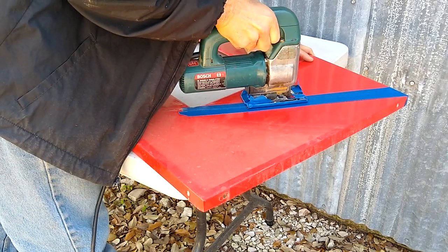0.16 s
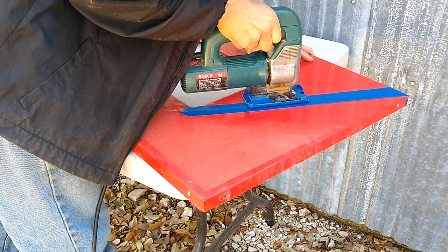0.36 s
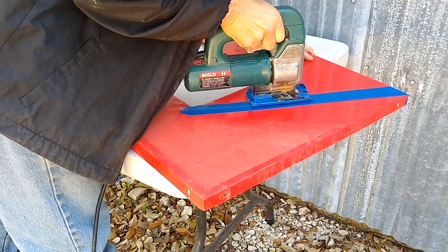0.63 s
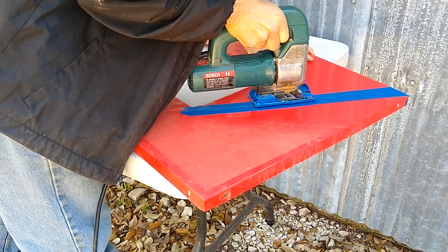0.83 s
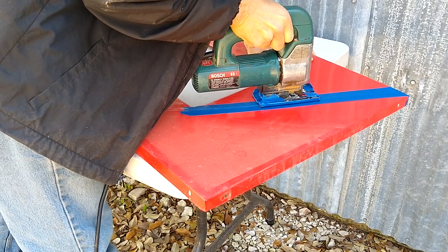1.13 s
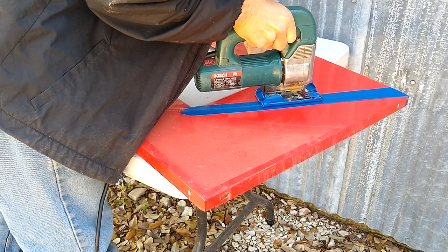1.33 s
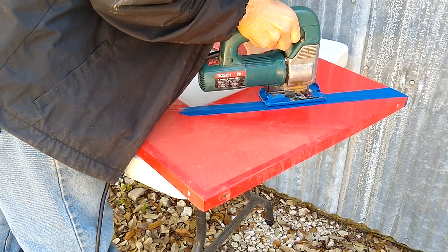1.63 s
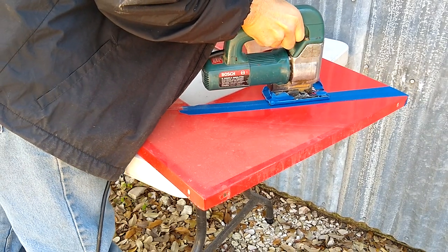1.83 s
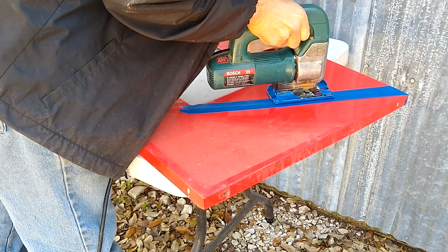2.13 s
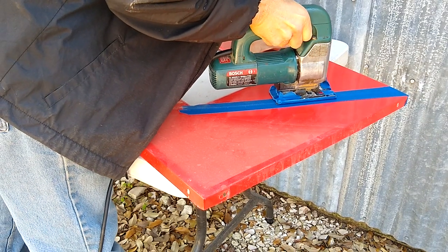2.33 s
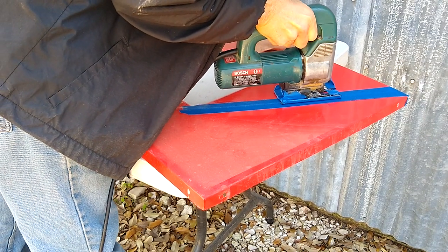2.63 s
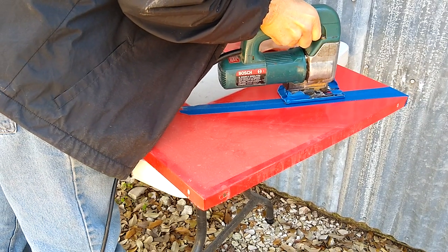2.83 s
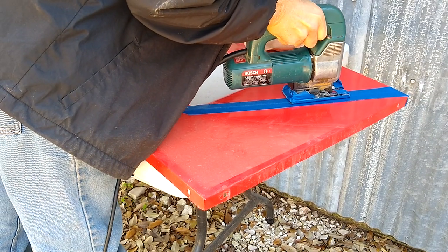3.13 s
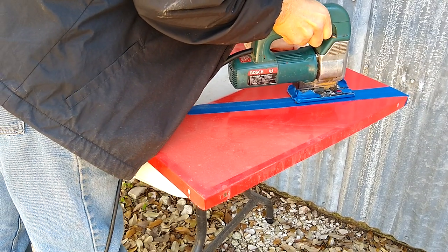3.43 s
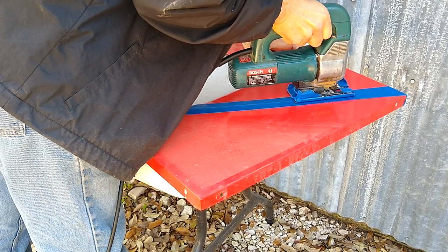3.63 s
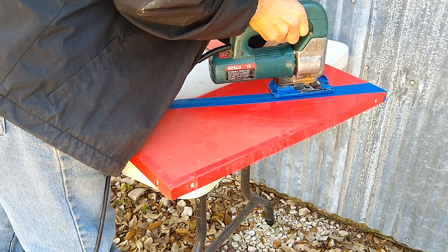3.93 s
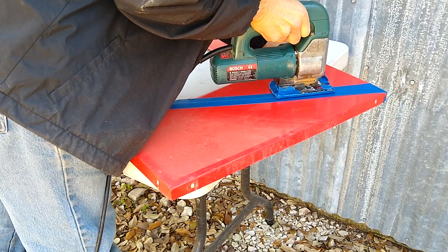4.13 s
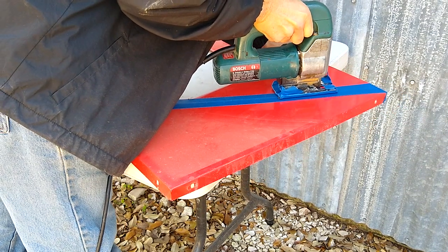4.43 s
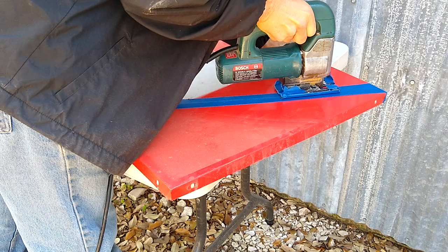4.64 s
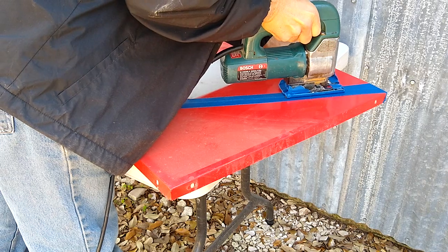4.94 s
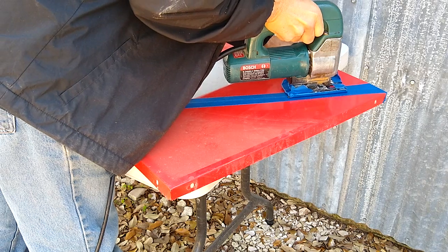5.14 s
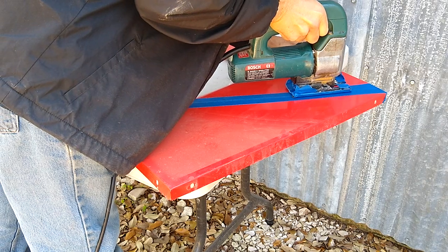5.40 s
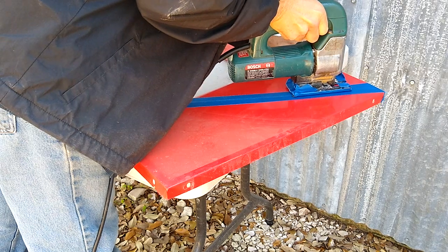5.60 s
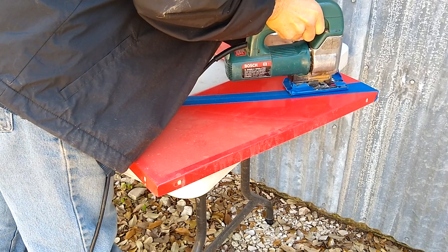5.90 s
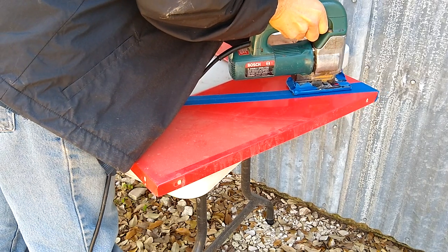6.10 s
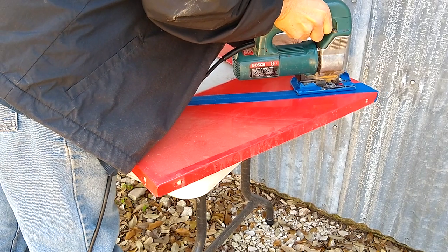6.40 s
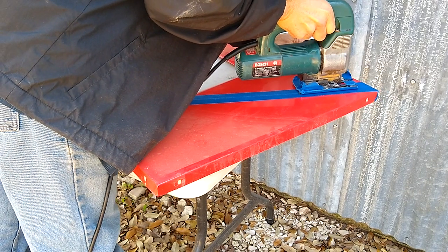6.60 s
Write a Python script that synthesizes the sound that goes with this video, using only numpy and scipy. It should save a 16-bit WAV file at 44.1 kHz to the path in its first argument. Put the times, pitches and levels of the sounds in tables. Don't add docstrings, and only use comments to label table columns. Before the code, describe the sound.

A jigsaw buzzes and squeals through sheet steel outdoors, sagging and recovering about seven times a second, pausing briefly midway, with loose metal slaps.

```python
import sys
import numpy as np
from scipy import signal
from scipy.fft import rfft, irfft, next_fast_len
from scipy.io import wavfile
from scipy.ndimage import uniform_filter1d, map_coordinates

SR = 44100
rng = np.random.default_rng(int(sys.argv[2]) if len(sys.argv) > 2 else 0)


def boost(x):
    u = np.asarray(x, float) / 20
    return 10 ** u


def put_to_file(sound):
    columns = np.atleast_2d(sound).T
    safe = np.clip(columns, -1, 1)
    whole_steps = np.round(safe * 32767)
    wavfile.write(sys.argv[1], SR, whole_steps.astype(np.int16))


N = 298116


def evened(x):
    return x / np.sqrt(np.mean(x ** 2) + 1e-20)


def read(points, hz, axis=1):
    table = np.transpose(points)
    return np.interp(np.log(hz + 1), np.log(table[0] + 1), table[axis])


def coloured(x, spectrum):
    gain = boost(read(spectrum, np.fft.rfftfreq(N, 1 / SR)))
    return evened(irfft(rfft(x) * gain, N))


def resonate(x, hz, width_hz):
    carrier = np.exp(2j * np.pi * np.cumsum(hz * np.ones(len(x))) / SR)
    pole = np.exp(-np.pi * width_hz / SR)
    return 2 * (carrier * signal.lfilter([1 - pole], [1, -pole], x / carrier)).real


def add(mix, start_s, sound):
    part = mix[round(start_s * SR):][:len(sound)]
    part += sound[:len(part)]


def grit(per_s, spread_db):
    chips = rng.random(N) < per_s / SR
    size_db = spread_db * np.minimum(rng.exponential(1, N), 4)
    return chips * rng.standard_normal(N) * boost(size_db)


def patches(shape, bins, frames):
    field = uniform_filter1d(rng.standard_normal(shape), size=bins, axis=0)
    return evened(uniform_filter1d(field, size=frames, axis=1))


def recoveries(cut):
    start_s, speed_hz, bite_db = np.vstack([cut, np.array(cut[-1]) + [.145, 0, 0]]).T
    top_s = start_s[:-1] + .47 * np.diff(start_s)
    top_hz = (speed_hz[:-1] + speed_hz[1:]) / 2 + 29.005
    top_bite_db = -42 + 0.73 * ((bite_db[:-1] + bite_db[1:]) / 2 + 44.0)
    return np.transpose([top_s, top_hz, top_bite_db])


def motor_states():
    # start_s [s], speed_hz [Hz], bite_db [dB]
    first_cut = [(.006, 164.4, -43.5), (.143, 141.3, -47), (.33, 167.2, -49), (.502, 164.2, -43),
                 (.65, 166.7, -41.5), (.799, 155.6, -40.5), (.931, 151, -40.5), (1.088, 139.7, -43),
                 (1.215, 143, -40), (1.352, 152.4, -41), (1.518, 156.5, -40.5), (1.669, 148.8, -42),
                 (1.814, 140.7, -42), (1.964, 138, -43.5), (2.11, 144.2, -41.5), (2.256, 144.4, -44),
                 (2.403, 161.4, -42.5), (2.559, 147.5, -42), (2.701, 148.5, -42.5), (2.848, 150.5, -41),
                 (2.979, 152.9, -41), (3.13, 156.2, -40), (3.277, 155.7, -40.5), (3.404, 162.3, -38.5),
                 (3.577, 155, -40.5)]
    second_cut = [(4.194, 141.7, -42.5), (4.347, 156.4, -43), (4.483, 153, -41), (4.611, 156.4, -41.5),
                  (4.772, 149.8, -43.5), (4.923, 143.3, -44.5), (5.071, 148.4, -43.5), (5.214, 156.2, -42),
                  (5.358, 149.1, -43.5), (5.496, 152.4, -43.5)]
    last_cut = [
        (5.912, 155, -38.5),
        (6.061, 163.8, -42.5),
        (6.214, 168.8, -39),
        (6.365, 152, -40.5),
        (6.559, 135.4, -46),
        (6.71, 138.8, -42.5),
    ]
    # start_s [s], speed_hz
    # [Hz], bite_db [dB]
    hand_eases = [
        (3.702, 177, -57),
        (3.821, 132.2, -57),
        (3.863, 136.8, -59),
        (3.948, 119.3, -57),
        (4.041, 130.7, -56),
        (4.088, 156.3, -48),
        (4.12, 171.6, -46),
                  (5.64, 151.7, -42.5),
        (5.689, 130.6, -58),
        (5.769, 150.8, -52),
        (5.799, 156.1, -40.5),
        (5.862, 170.4, -39),
    ]
    cuts = first_cut, second_cut, last_cut
    bottoms = np.vstack(cuts)
    tops = np.vstack([recoveries(cut) for cut in cuts])
    eases = np.array(hand_eases)
    rows = np.vstack([np.c_[part, np.full(len(part), swing)]
                      for part, swing in [(bottoms, -1), (tops, 1), (eases, 0)]])
    return rows[np.argsort(rows[:, 0])].T


def control(name):
    stage_ends = [1.4, 2.3, 3.15, 3.9, 4.95, 5.72]
    # hiss_db [dB], fizz_db [dB], rumble_db [dB]
    stage_lifts = [(0, 0, -0.3), (-0.5, -0.5, 0.3), (0.3, -1.5, -0.5), (0.1, 0, -.7), (0.6, 2.5, -2.5),
                   (0.6, 1, -0.6), (1, 1, 0.7)]
    start_s, speed_hz, bite_db, swing = motor_states()
    missing_db = np.minimum(bite_db + 45, 0)
    stage = sum(np.clip((start_s - end_s) / 0.28 + .5, 0, 1) for end_s in stage_ends)
    hiss_db, fizz_db, rumble_db = (np.interp(stage, np.arange(len(stage_lifts)), lift)
                                   for lift in np.transpose(stage_lifts))
    values = dict(
        speed_hz=speed_hz,
        bite_db=bite_db,
        hiss_db=hiss_db - 50 + 0.44 * swing + 0.18 * missing_db,
        fizz_db=fizz_db - 50 + 1.2 * swing + 0.29 * missing_db,
        rumble_db=rumble_db - 57 + 0.67 * swing + 0.38 * missing_db)
    return uniform_filter1d(np.interp(np.arange(N) / SR, start_s, values[name]), size=600)


def throb(turns, depth, third):
    return np.exp(depth * np.cos(2 * np.pi * turns) + third * np.cos(3 * 2 * np.pi * turns + 1))


def wear(turns):
    surface = rng.standard_normal((round(N / SR) * 256, 257))
    surface = uniform_filter1d(surface, size=5, axis=0)
    return evened(map_coordinates(surface, [turns, turns % 1 * 256], order=1))


def panel(x):
    # mode_hz [Hz], lift_db [dB]
    young_cut = [
        [(1050, 1), (1170, 6), (1490, 4), (3160, 5), (3350, 1), (6890, 10.5), (7460, 9), (9460, 3.5),
         (11020, -14), (11590, 1), (12540, -1), (13120, 4), (13650, 9), (14840, 5)],
        [(730, 13.5), (1170, 7), (1890, 3), (3370, 5.5), (5310, 8), (5480, 6), (6850, 8), (7580, 13.5),
         (7760, 6), (9820, 8.1), (10120, 0), (10270, -3), (10980, -1), (11590, 6)],
        [(680, 0), (1030, -2), (2880, 0.5), (3350, 2), (4340, 1.5), (5180, 5), (8250, 2), (8530, 8.5),
         (8960, -4), (9390, 5), (13420, -1), (14840, 10), (15240, -4)],
        [(1030, 9), (1470, 4), (2040, 2), (3150, 4), (4190, 3.5), (5160, 7), (7630, 9), (8080, 10), (8550, 1),
         (9380, 11), (10080, 11), (11250, 7.5), (11580, 6), (14400, 4.9)],
        [(940, 11), (1410, 4), (2460, 2), (4170, 7), (6050, 4), (6610, 3.2), (6900, 7), (7420, -5), (7620, 9),
         (8060, 11), (9040, 6), (9760, 7), (10910, 6), (14820, 7)],
        [(2350, 1), (4340, 7), (6200, 7), (6880, 8.5), (7280, 3), (8320, 3), (9140, 5), (9500, 10),
         (10880, 4.7), (11490, 1), (13010, 7), (14360, 12)],
        [(650, 12), (790, 8), (1450, 4), (3170, 6.5), (4380, 6.5), (6340, 5), (8270, 10), (9100, 6), (9510, 8),
         (10900, 8), (11230, 4), (13350, 8), (14050, 6), (14800, 7)],
    ]
    # mode_hz [Hz], lift_db [dB]
    long_cut = [
        [(690, 10), (1300, 8), (2110, 4), (4510, 4), (6350, 6), (7320, 3), (8430, 3), (9080, 5), (9690, 1),
         (10110, 7), (11210, 8.5), (14260, 6)],
        [(680, 13), (950, 12), (2370, 10), (3270, 2), (5300, 6), (10380, 4.0), (11190, 3), (12010, -3),
         (12710, 3.4), (14360, 7)],
        [(780, 13), (1270, 14.5), (2390, 6), (3320, 4.5), (6980, 9), (8000, 5), (8270, 7.5), (9200, 8),
         (10260, -2)],
        [(780, 6.5), (1100, 10), (1250, 11.5), (3240, 5), (4480, 6.5), (7430, 6), (7750, 1.5), (8460, 7),
         (9260, 9), (9490, 7), (10990, 4), (12240, 2), (13080, -2)],
        [(780, 5), (1250, 8.5), (2320, 3), (3240, 6.5), (4470, 5.5), (5290, 4), (6710, 9.5), (8150, -11),
         (8380, 1), (9480, 8), (10590, 4.2), (10980, -1), (13520, 1), (14690, 2)],
        [(1400, 12), (1700, 11), (3300, 4), (5030, 6.5), (5250, 2), (6330, 5), (7360, 6), (8010, -2), (8360, 6),
         (9470, 9), (10550, 7.5), (14000, 6), (15120, 3), (15260, -2)],
    ]
    mode_shifts = [.45, .9, 1.4, 1.85, 2.3, 2.7, 3.15, 3.65, 4.12, 4.95, 5.7, 6.2]
    stages = [*young_cut, *long_cut]
    hz, t, z = signal.stft(x, SR, nperseg=2048, noverlap=1536)
    stage = sum(np.clip((t - shift_s) / 0.5 + .5, 0, 1) for shift_s in mode_shifts)
    rings = [sum((boost(1.07 * lift_db) - 1) / (1 + 2j * (hz - mode_hz) / (38 + 0.0048 * mode_hz))
                 for mode_hz, lift_db in modes) for modes in stages]
    fades = np.clip(1 - abs(stage - np.arange(len(stages))[:, None]), 0, 1)
    uneven = boost(2.0 * patches(z.shape, bins=6, frames=5) - 0.2)
    return signal.istft(z * (np.transpose(rings) @ fades) * uneven, SR, nperseg=2048, noverlap=1536)[1][:N]


def stand(turns):
    # band_hz [Hz], level_db [dB]
    stand_spectrum = [(30, -65), (160, -49), (310, -13), (600, -3.5), (1000, 2.5), (1600, 3), (2400, 2.5),
                      (3500, -36)]
    near, left, right = (coloured(rng.standard_normal(N), stand_spectrum) for _ in range(3))
    orders = sum(boost(8 * (k in (5, 7))) * np.cos(2 * np.pi * k * turns + k * k) for k in range(4, 15))
    orders = coloured(orders, stand_spectrum)
    grip = boost(0.9 * (control("bite_db") + 49.5))
    loosening_db = .5 * np.arange(N) / SR
    level_db = -65.5 + 0.62 * (control("rumble_db") + 58.5) + loosening_db
    ringing = panel(0.53 * near + 0.29 * grip * orders)
    return boost(level_db) * (near + ringing + 0.39 * np.array([left, right]))


def slaps():
    # start_s [s], level_db [dB], pitch_hz [Hz]
    slap_events = [(.445, -23, 702), (.463, -49, 800), (.61, -30, 590), (1.446, -47, 506),
                   (1.789, -33, 1011), (1.791, -23, 360), (1.823, -28, 600), (1.835, -30, 900),
                   (1.877, -28.5, 546), (2.3, -35, 598), (2.339, -42, 696.7), (3.796, -47, 400),
                   (3.851, -55, 512.3), (4.015, -57, 400), (5.435, -44, 575.5), (5.54, -32, 505.6),
                   (5.768, -26, 699), (5.78, -29, 533.5), (5.833, -48, 557), (5.915, -38, 603),
                   (5.935, -37, 601.6), (6.23, -41, 716)]
    out, t = np.zeros(N), np.arange(800) / SR
    for start_s, level_db, pitch_hz in slap_events:
        phase = 2 * np.pi * pitch_hz * t
        ring = np.sin(phase) + 0.35 * np.sin(1.68 * phase) + 0.18 * np.sin(3.7 * phase)
        rattle = evened(resonate(rng.standard_normal(800), pitch_hz, 700))
        decay = boost(level_db - 6.5 - 60 * t / 0.033)
        add(out, start_s, decay * (ring + 0.58 * rattle) * np.minimum(t / 0.001, 1))
    return signal.sosfilt(signal.butter(3, 280, "high", fs=SR, output="sos"), out)


def catches():
    # start_s [s], level_db [dB], pitch_hz [Hz], length_s [s]
    catch_events = [(4.9, -64, 7600, 0.014), (5.805, -36, 6980, 0.025), (5.765, -41, 4700, 0.042),
                    (6.69, -42, 4700, 0.054), (1.2, -44, 13000, 0.052), (0.9, -45, 13000, 0.053),
                    (2, -56, 600, 0.084), (0.37, -51, 14400, 0.063), (6.68, -38, 15030, 0.07),
                    (3.795, -45, 7350, 0.033), (5.34, -43, 5500, 0.11), (3.9, -32, 9800, 0.041),
                    (6.53, -60, 7400, 0.037), (3.975, -50, 3690, 0.03), (5.58, -44.5, 3300, 0.064)]
    out = np.zeros(N)
    for start_s, level_db, pitch_hz, length_s in catch_events:
        count = round(length_s * SR)
        chirp = evened(resonate(rng.standard_normal(size=6000), pitch_hz, 390))[:count]
        add(out, start_s, boost(level_db - 5.0) * chirp * np.hanning(count))
    return out


def rumble(turns):
    # band_hz [Hz], level_db [dB]
    rumble_spectrum = [(30, -77), (100, -22), (170, -25.5), (250, -5.5), (350, -5), (500, -2.5), (700, 2),
                       (1000, -1.5), (1500, -2.5), (2200, -9.5), (3000, -12.5)]
    # order [multiple of shaft speed], level_db [dB]
    shaft_orders = [(2, -19), (3, -15.5), (4, -14), (6, -12), (10, -17.5)]
    drum = coloured(throb(turns, depth=0.75, third=0.05) * rng.standard_normal(N), rumble_spectrum)
    lines = sum(boost(level_db) * np.sin(2 * np.pi * round(order) * turns + order)
                for order, level_db in shaft_orders)
    return boost(control("rumble_db") + 3.0) * (drum + lines)


def casing(turns):
    # band_hz [Hz], level_db [dB]
    casing_spectrum = [(1200, -24.5), (2000, -7), (2700, -3.5), (3200, 0), (4500, 0), (6000, -0.5),
                       (8000, 1.5), (10000, 1), (12000, -37)]
    # band_hz [Hz], level_db [dB]
    fizz_spectrum = [(8000, -23), (10000, 5.5), (12000, 9), (14000, 4), (15500, 4.5), (17000, -4)]
    rasp = evened(grit(per_s=30000, spread_db=-0.5)) + .5 * wear(turns)
    hiss = coloured(throb(turns, depth=0.016, third=0.049) * rasp, casing_spectrum)
    chips = grit(per_s=22000, spread_db=2.2)
    fizz = coloured(throb(turns, depth=0.22, third=0.052) * chips, fizz_spectrum)
    return boost(control("hiss_db") + 5.0) * hiss + boost(control("fizz_db") + 4.5) * fizz


def squeal(speed_hz, turns):
    centre_hz = 9250 + 88 * (speed_hz - 165)
    chips = evened(grit(per_s=19000, spread_db=-4.0))
    depth = np.clip(.75 + .017 * (165 - speed_hz), .3, 1.2)
    scrape = throb(turns, depth, third=.3) * (wear(turns) + .35 * chips)
    band = resonate(resonate(scrape, centre_hz, 2020), centre_hz, 2020)
    energy = boost(2 * control("bite_db")) - boost(2 * (control("hiss_db") + 1.5))
    return np.sqrt(np.maximum(energy, 1e-8)) * boost(0.1) * evened(band)


def chatter(x):
    _, _, z = signal.stft(x, SR, nperseg=512)
    field_db = 0.74 * patches(z.shape, bins=3, frames=12)
    field_db += 0.5 * patches(z.shape, bins=70, frames=6)
    field_db += 1.01 * patches(z.shape, bins=150, frames=1)
    return signal.istft(z * evened(boost(field_db)), SR, nperseg=512)[1][:N]


def ports(x):
    # band_hz [Hz], right_lead [rad], likeness [0-1], left_minus_right_db [dB]
    port_table = [(100, 3.65, 0.6, 0), (400, 3.02, 0.72, -1), (800, 3.58, 0.7, -2), (1230, 3.8, 0.56, -3),
                  (1830, 4.59, 0.93, -4), (2410, 5, 0.93, -0.5), (2940, 5.65, 0.93, -2.5),
                  (5000, 5.9, 0.87, 1), (7220, 7.54, 0.81, 4.5), (7630, 8.24, 0.29, 3),
                  (9380, 9, 0.83, 0.5), (10240, 9.55, 0.85, -3), (12000, 10.83, 0.59, -2),
                  (13300, 12, 0.87, -1)]
    size, t = next_fast_len(N + 8192), np.arange(4096) / SR
    hz, side = np.fft.rfftfreq(size, 1 / SR), np.array([[-.5], [.5]])
    tails = rng.standard_normal((2, 2, 4096)) * boost(-60 * t / 0.068) * np.clip(t / 0.0061 - 1, 0, 1)
    walls = np.exp(1j * np.angle(rfft(tails, size)))
    drift = 2 * np.pi * .9 * np.arange(N) / SR
    scatter = rfft(x * np.cos(drift), size) * walls[0] + rfft(x * np.sin(drift), size) * walls[1]
    direct = rfft(x, size) * np.exp(1j * side * read(port_table, hz))
    same = np.clip(read(port_table, hz, axis=2), 0, 1)
    balance = boost(-side * read(port_table, hz, axis=3))
    return irfft((np.sqrt(same) * direct + np.sqrt(1 - same) * scatter) * balance, size)[:, :N]


def scene():
    slap_gains = [
        [.58],
        [-0.49],
    ]
    speed_hz = control("speed_hz")
    turns = np.cumsum(speed_hz) / SR
    load = boost(0.21 * (174.0 - speed_hz) + 1.02 * (control("bite_db") + 46.0))
    slap = slaps()
    cut, hiss = squeal(speed_hz, turns), casing(turns)
    sheet = panel(0.56 * cut + 0.57 * load * hiss)
    saw = boost(-1.5) * (0.82 * cut + hiss + sheet)
    heard = ports(chatter(saw + rumble(turns)) + catches() + 0.47 * slap)
    return heard + np.array(slap_gains) * slap + stand(turns)


def roll_off(x):
    return signal.sosfilt(signal.butter(12, 16720, fs=SR, output="sos"), x)


def record(dry):
    lowpass = signal.firwin(511, 15740, window=("kaiser", 9), fs=SR)
    limited = signal.oaconvolve(dry, lowpass[None], "same")
    return roll_off(limited)


dry = scene()
out = record(dry)
put_to_file(out)
```